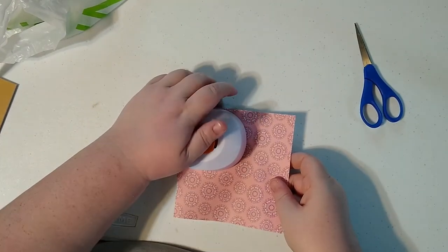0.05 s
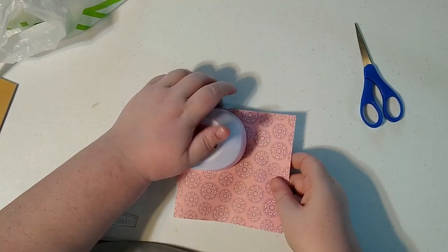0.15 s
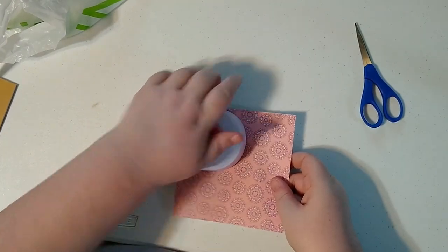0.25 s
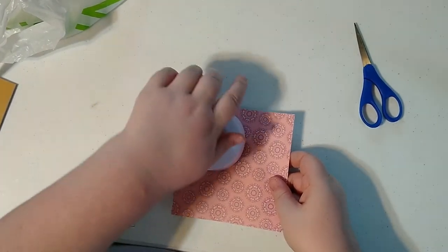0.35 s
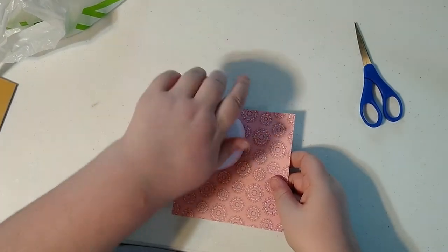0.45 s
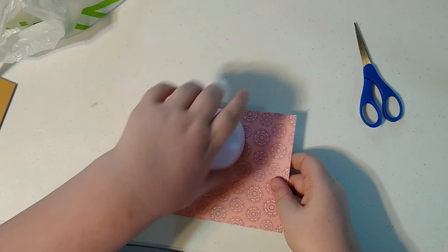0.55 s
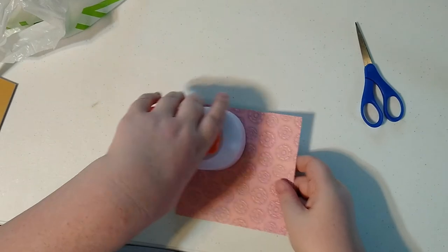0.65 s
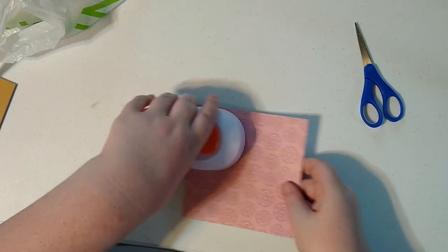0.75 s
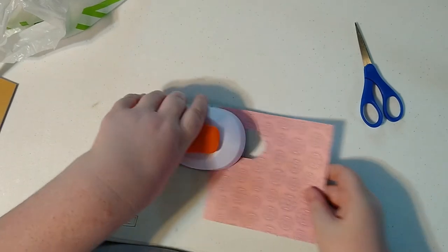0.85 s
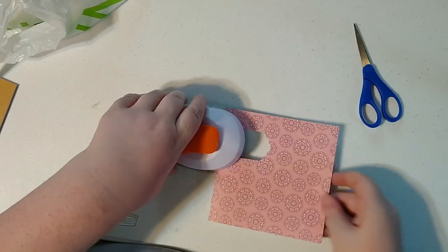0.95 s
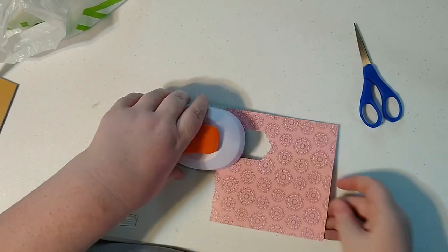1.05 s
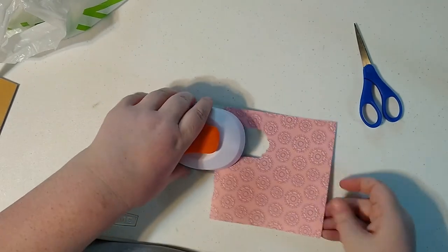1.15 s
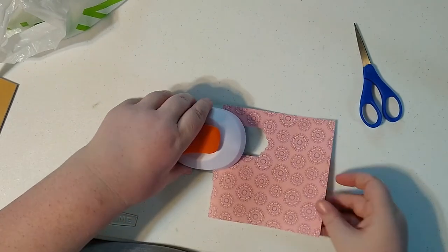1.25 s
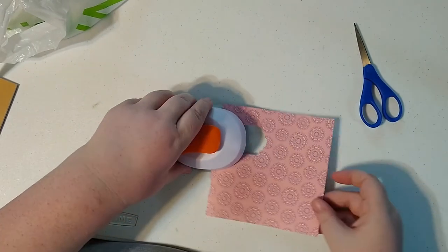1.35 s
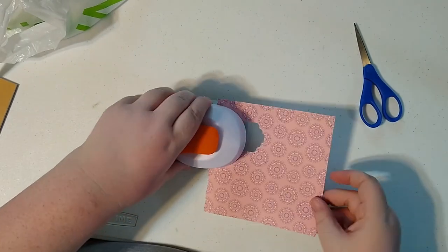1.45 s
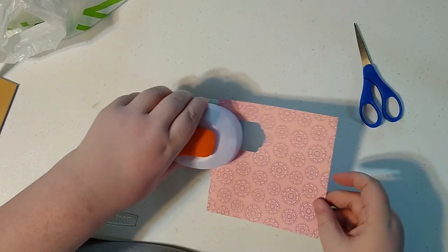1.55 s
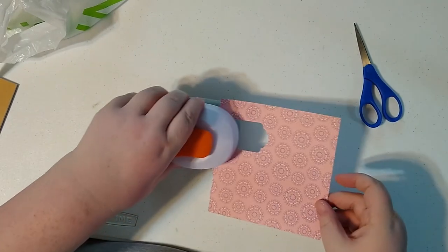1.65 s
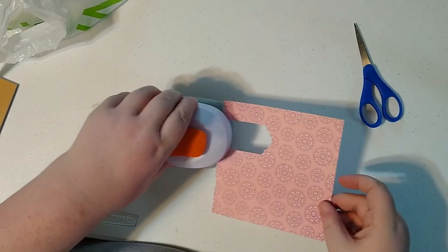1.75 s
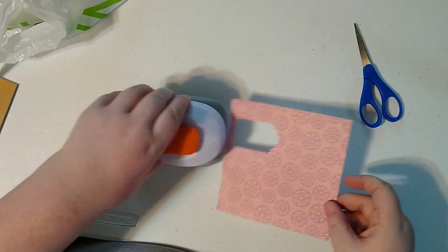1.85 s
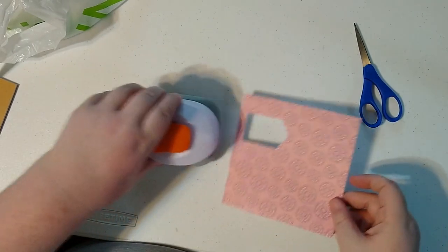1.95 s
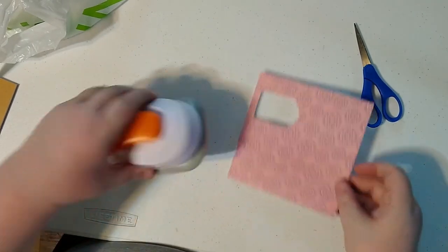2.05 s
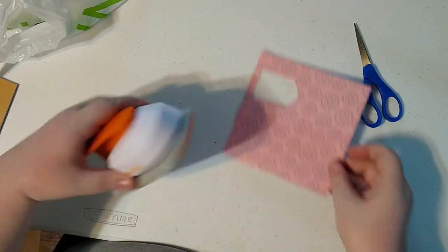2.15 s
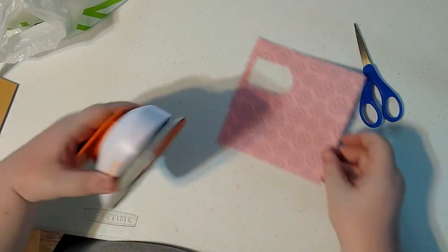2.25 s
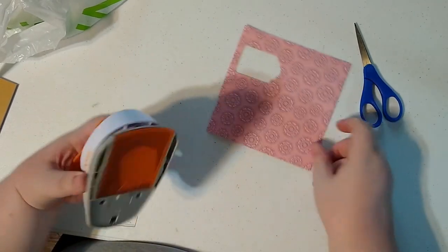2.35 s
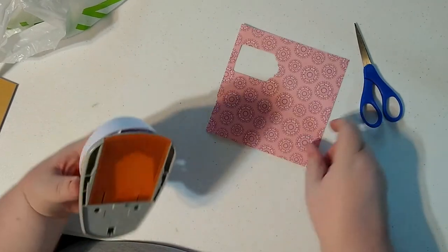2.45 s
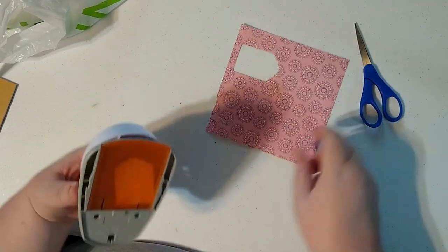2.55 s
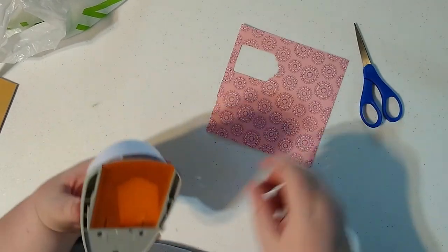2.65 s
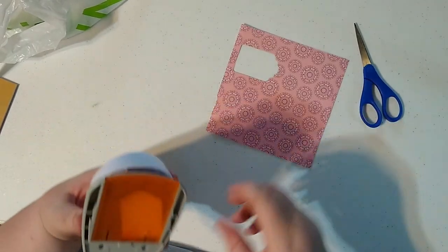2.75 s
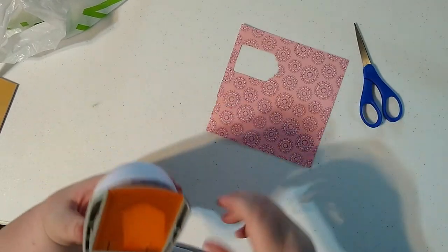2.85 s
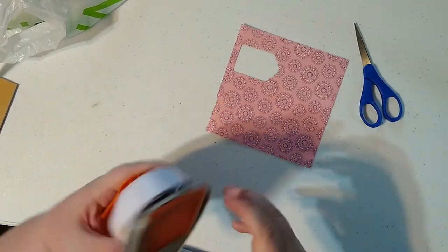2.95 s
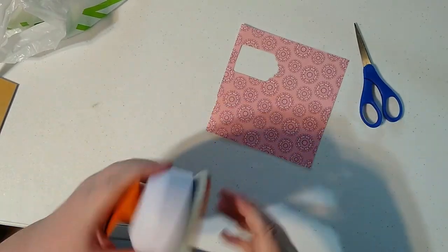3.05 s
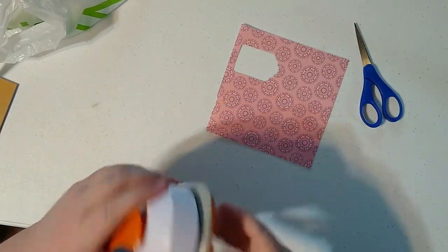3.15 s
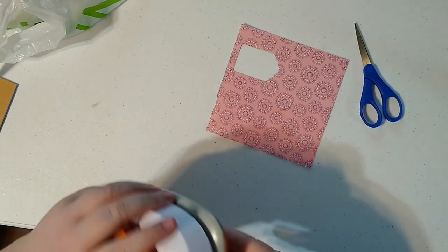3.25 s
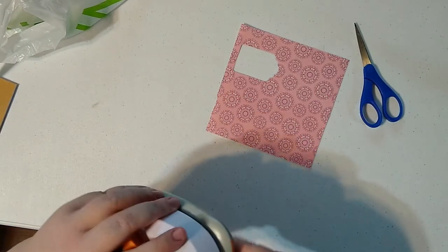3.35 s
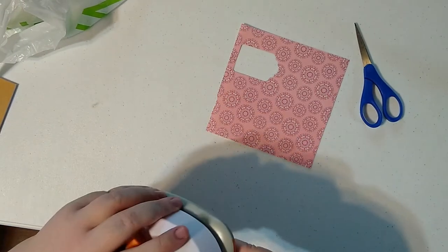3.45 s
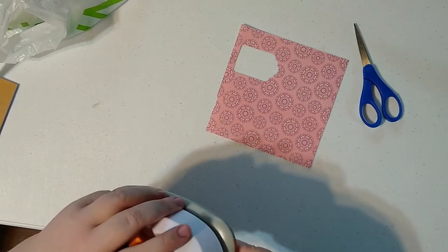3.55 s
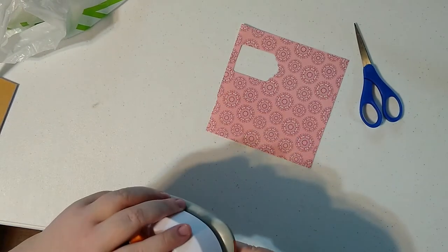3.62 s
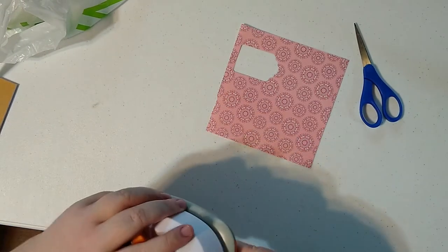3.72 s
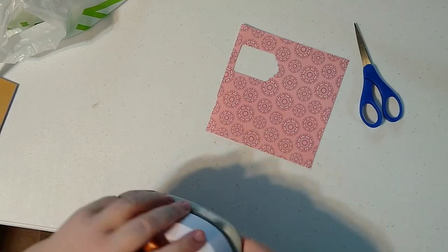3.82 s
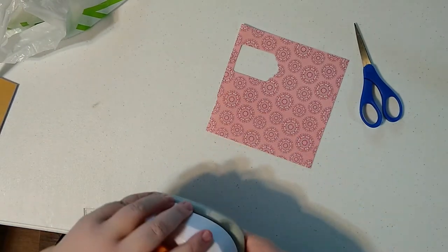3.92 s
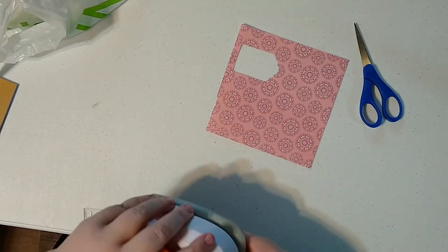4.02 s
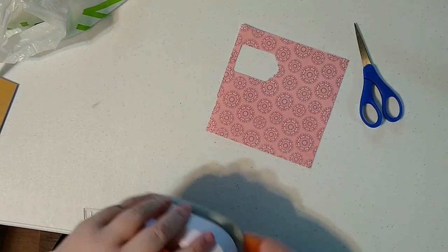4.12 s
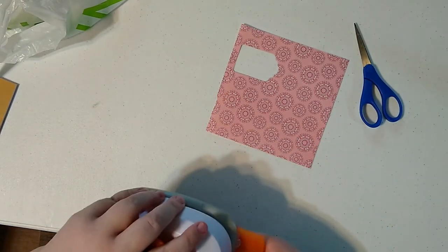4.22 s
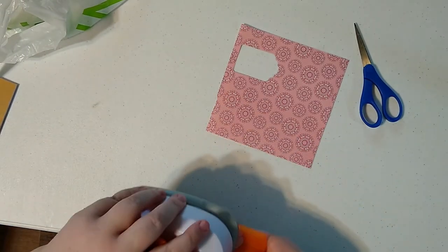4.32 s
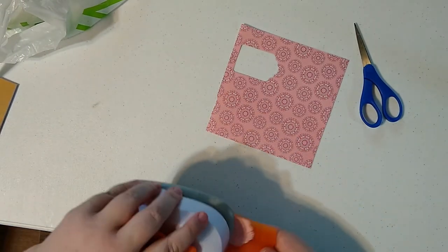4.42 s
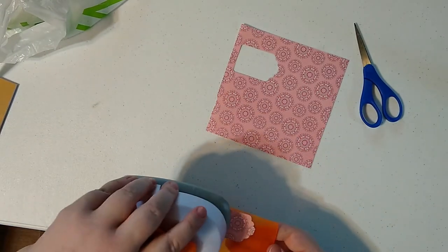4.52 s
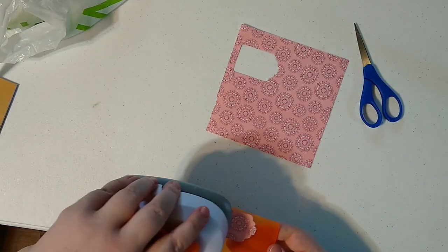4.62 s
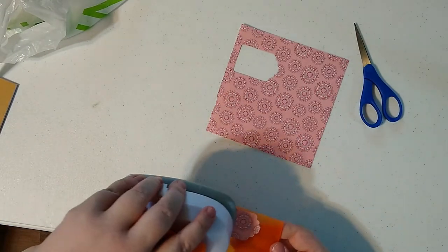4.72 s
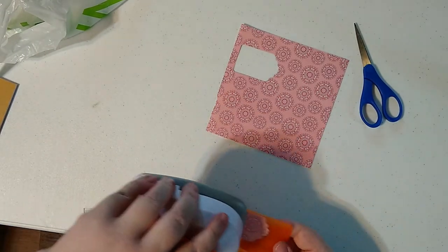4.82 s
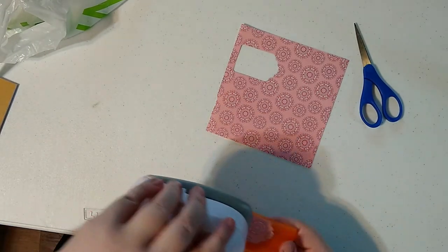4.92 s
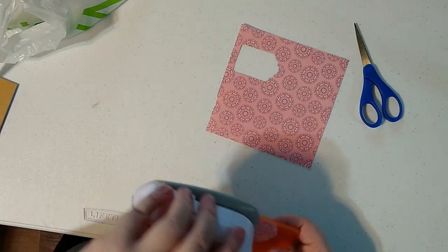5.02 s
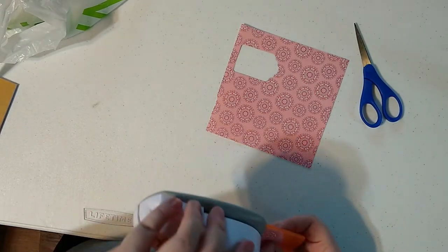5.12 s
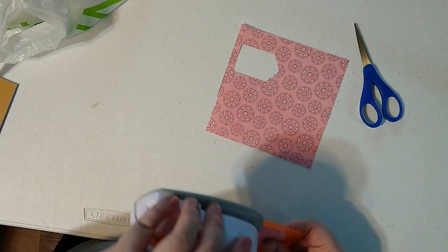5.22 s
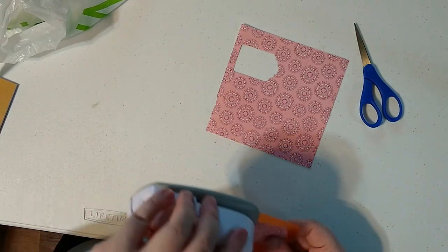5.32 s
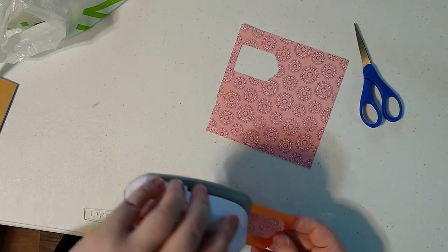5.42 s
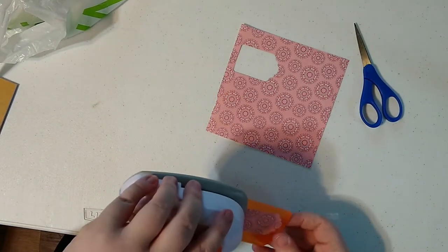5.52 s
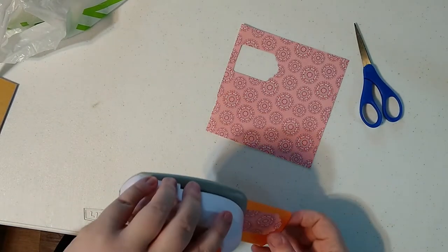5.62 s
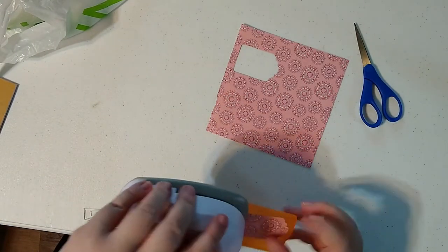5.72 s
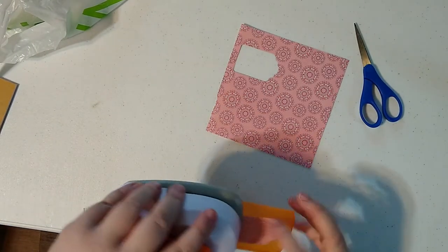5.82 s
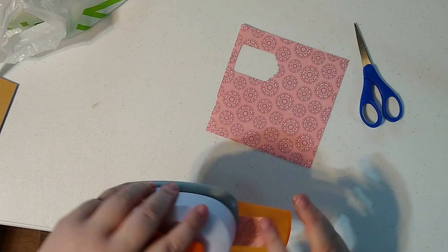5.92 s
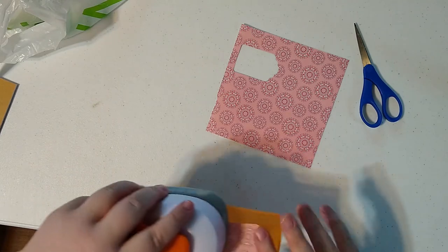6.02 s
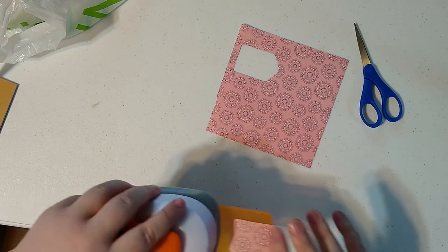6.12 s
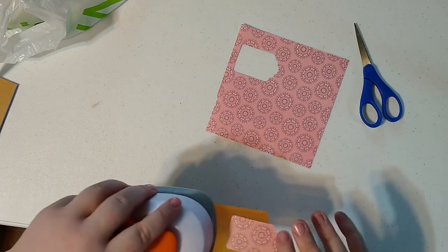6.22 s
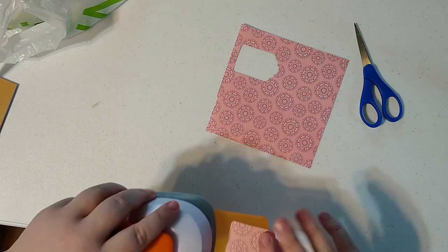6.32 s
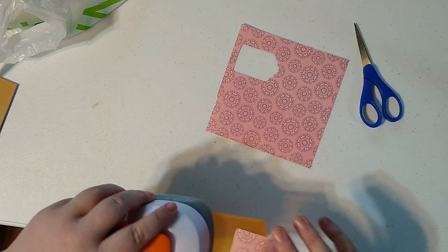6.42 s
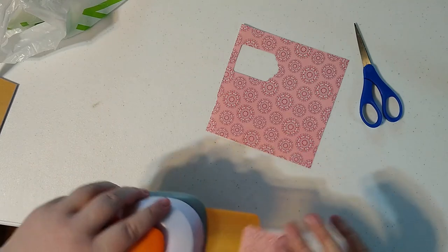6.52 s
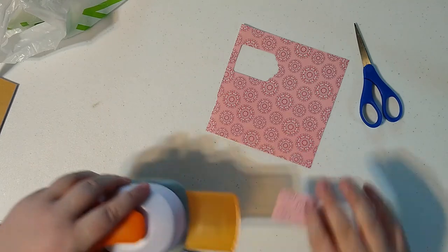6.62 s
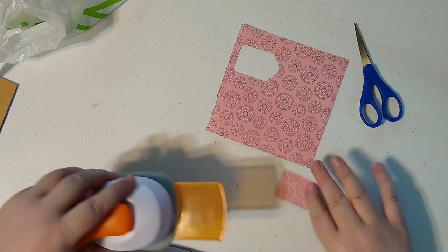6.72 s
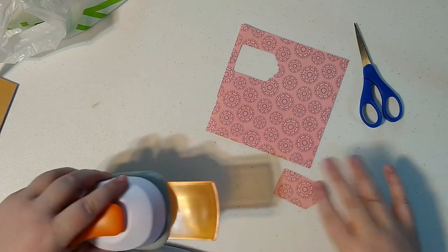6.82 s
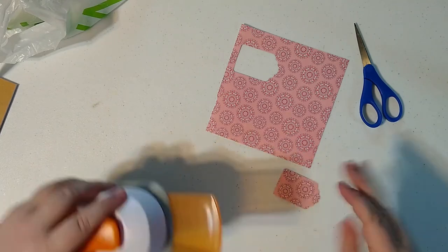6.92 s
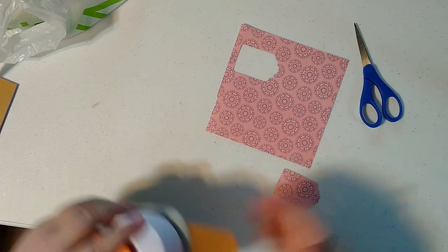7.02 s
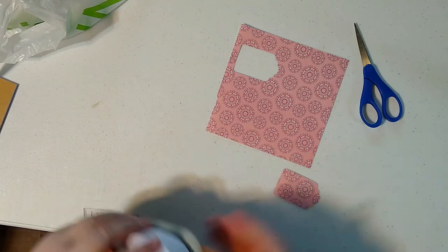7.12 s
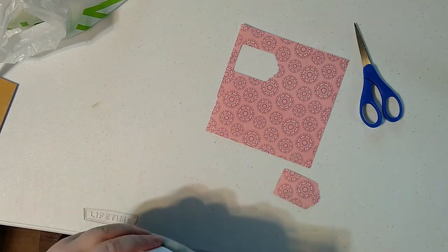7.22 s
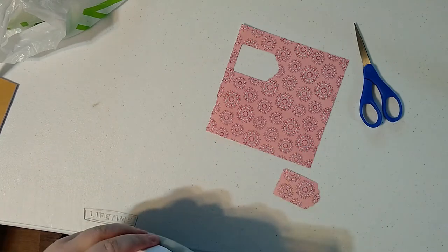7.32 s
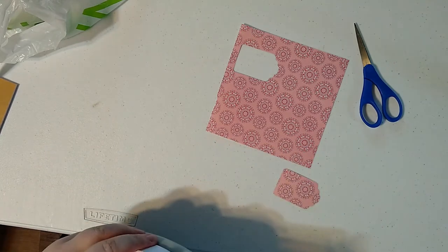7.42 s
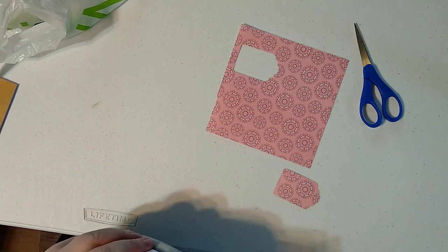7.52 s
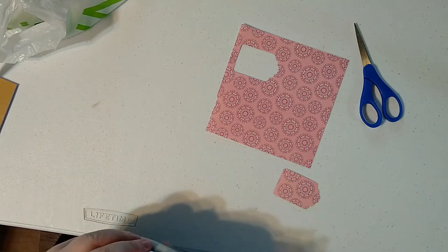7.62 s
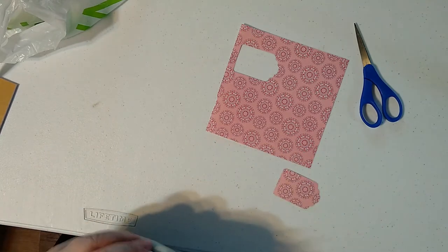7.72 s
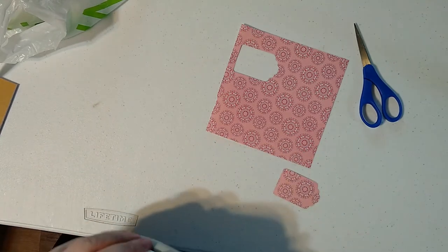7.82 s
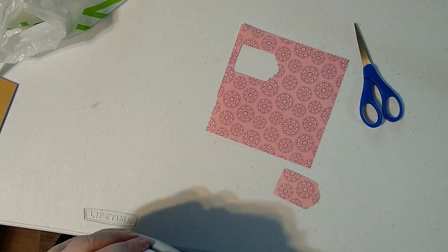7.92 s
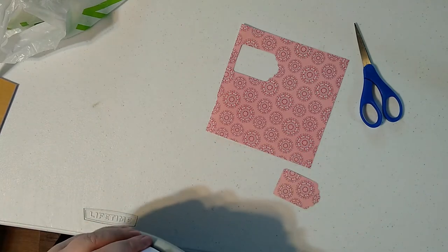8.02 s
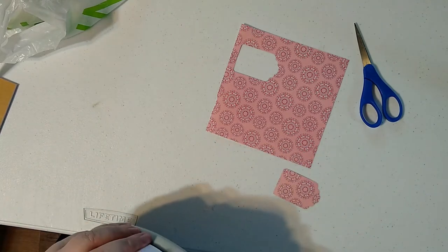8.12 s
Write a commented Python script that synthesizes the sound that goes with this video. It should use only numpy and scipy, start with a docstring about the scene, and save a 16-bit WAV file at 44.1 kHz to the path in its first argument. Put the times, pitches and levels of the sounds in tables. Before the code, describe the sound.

Card cracks under a craft punch with a ringing table thump, then faint plastic clicks and scrapes until its tray snaps shut.

```python
"""A table in a small quiet room, heard by two microphones above it.
A plastic craft punch crunches through card: the fibres crack, then the lever bottoms out with a thump
that makes the table ring. The card slides out with a soft hiss and the punch is picked up.
Its tray clicks open to free the cut-out, scrapes along its guides and snaps shut, ringing the plastic.
Fingertips brush the paper, a hand pats the table, and ventilation hums faintly."""
import sys
import numpy as np
from scipy import signal
from scipy.fft import rfft, irfft, next_fast_len
from scipy.io import wavfile
from scipy.ndimage import map_coordinates

SR = 44100
rng = np.random.default_rng(int(sys.argv[2]) if len(sys.argv) > 2 else 0)


def generate_wav(sig):
    """Save sig (samples, or channels by samples) to the path in sys.argv[1] as 16-bit PCM at SR."""
    pcm = np.round(np.clip(np.atleast_2d(sig).T, -1, 1) * 32767).astype(np.int16)
    wavfile.write(sys.argv[1], SR, pcm)


N = 359856


def card_cutting():
    """The palm presses and the housing creaks; card fibres shear ever harder, then crack apart."""
    # Pushes of the palm. Each row: peak time in seconds, level in dB, rise and fall in seconds.
    presses = [(.256, -52.5, .006, .07), (.343, -34.5, .018, .06)]
    # The blade breaks through. Each row: start in seconds, relative level in dB.
    cracks = [(0.3514, -30), (0.381, -21.5), (0.389, -20), (0.392, -8), (0.3956, -10)]
    # The tone of tearing card. Each row: frequency in Hz, relative level in dB.
    card_colour = [(40, -39.5), (130, -6.5), (520, -5.5), (1050, -3), (1290, -9.5), (1560, -4),
                   (1900, -6.5), (2300, -12), (3500, -14), (6000, -23.5), (8500, -35.5), (15000, -33)]
    creak_colour = [(40, -30.5), (120, -9), (330, 1), (620, -1.5), (1100, -15.5), (3000, -29.5),
                    (9000, -50.5)]
    palm = sum(stroke(*row) for row in presses)
    y = palm * friction(creak_colour, slips_per_s=900, spread_db=1, smooth_db=-7)
    y += blade_gain() * friction(card_colour, slips_per_s=1900, spread_db=2, smooth_db=-8.5)
    for s, db in cracks:
        add(y, s, amp(db + 13.5) * contact(card_colour, tilt_db=-3, rattle_db=5.5, rattle_s=.014))
    return in_room(y, wet_db=-5)


def blade_gain():
    """Shearing grows from the bite to the break, drops to a rub and fades once the blade bottoms out."""
    bite_s, break_s, bottom_s = .341, .392, .44
    shear_db, growth_db_per_s, rub_db = -41.5, 130, -42
    rise_s, fall_s = .02, .096
    t = np.arange(N) / SR
    level_db = np.where(t < break_s, shear_db + growth_db_per_s * np.maximum(t - bite_s, 0), rub_db)
    fade_db = 20 * (np.maximum(bite_s - t, 0) / rise_s + np.maximum(t - bottom_s, 0) / fall_s)
    return amp(level_db - fade_db)


def table_thumps():
    """The lever bottoms out, the punch judders and the table top rings. Later a hand pats it."""
    # The punch strikes the table. Each row: start in seconds, relative level in dB.
    thumps = [(0.326, -39.5), (.398, -16.5), (0.441, -3)]
    # A hand lands softly. Each row: start in seconds, relative level in dB.
    pats = [(6.875, -49), (6.892, -56), (6.915, -63.5)]
    # The table top's notes. Each row: frequency in Hz, relative level in dB, ring time in seconds.
    table_modes = [(135, -12, 0.41), (226.6, -8, 0.25), (280, -15.5, 0.19), (336.3, 1, 0.17),
                   (397, -1.5, 0.13), (449, -16, 0.33), (535, -16.5, 0.23), (603, -18.5, 0.22),
                   (807, -7, 0.12), (910, -16, 0.14)]
    # The tone of a thud. Each row: frequency in Hz, relative level in dB.
    thud = [(20, -60), (45, -22), (75, -20), (125, -1.5), (180, -3), (350, -1.5), (510, 3), (780, -6),
            (1220, -18), (1580, -14.5), (2200, -31.5), (3600, -24), (5000, -36.5), (8000, -57),
            (15000, -62)]
    y, side = np.zeros(N), np.zeros(N)
    for s, db in thumps:
        push = contact(thud, tilt_db=1, rattle_db=-15, rattle_s=.034)
        judder, sway = [contact(thud, tilt_db=-.5, rattle_db=19, rattle_s=.17) for _ in range(2)]
        add(y, s, amp(db + 13) * judder - amp(db + 17) * push)
        add(y, s, amp(db + 11) * ring(table_modes, size=16384))
        wall_echo = contact(thud, tilt_db=-6.5, rattle_db=-4, rattle_s=.022)
        add(y, s + .022, amp(db + 4) * wall_echo)
        add(side, s, amp(db + 7) * sway)  # the wide top reaches each microphone differently
    for s, db in pats:
        add(y, s, amp(db + 21.5) * contact(thud, tilt_db=-22, rattle_db=7, rattle_s=.15))
    return in_room(y, wet_db=-14, delay_s=.006) + np.array([side, -side])


def tray_snap():
    """The tray snaps past its catch and slaps home; its thin walls ring."""
    # Hits on catch and seat. Each row: start in seconds, relative level in dB, treble boost in dB.
    snaps = [(7.8551, -11, 0.5), (7.8576, -8, 2.5), (7.8637, -16, -2), (7.8823, -10, 4.5),
             (7.888, -6.5, -4)]
    # The tone of the catch. Each row: frequency in Hz, relative level in dB.
    catch_colour = [(60, -36), (150, -31), (300, -27), (510, -26.5), (640, -2.5), (850, -4), (1150, 0),
                    (1400, -7), (1720, -2), (2200, -6), (3100, -5), (4600, -12.5), (6000, -25),
                    (8500, -27.5), (15000, -30)]
    # The closed tray's notes. Each row: frequency in Hz, relative level in dB, ring time in seconds.
    tray_modes = [(642, 6.5, 0.046), (1095, 1, 0.07), (1248, -9, 0.079), (1385.6, -8.5, 0.033),
                  (1732, -4, 0.11), (2360, -7.5, 0.07), (2817, -3, 0.054), (3450, -6.5, 0.081),
                  (4100, -11.5, 0.0584)]
    y = np.zeros(N)
    for s, db, bright_db in snaps:
        crack = contact(catch_colour, tilt_db=bright_db, rattle_db=15, rattle_s=.014)
        walls = ring(tray_modes, stretch=np.exp(rng.normal(0, .0049)))
        add(y, s, amp(db + 14.5) * (crack + amp(-11) * walls))
    return in_room(y, wet_db=-5.5)


def shell_clicks():
    """Small knocks ring the plastic shell, the dull ones most; its pitch shifts with the grip."""
    # Lever and tray clicks. Each row: start in seconds, relative level in dB, treble boost in dB.
    clicks = [(1.0439, -25, 3), (1.0474, -24, -3.5), (1.049, -34, -3.5), (2.228, -48, -7.5),
              (2.438, -48, -3), (3.081, -45, -8.5), (3.125, -48.5, -3), (3.204, -42, -8.5),
              (3.521, -46.5, -1), (3.774, -27, -1), (3.7761, -33.5, -1.5), (3.855, -45, 0), (3.876, -48, 0),
              (3.942, -38, 0), (4.031, -42.5, -6), (4.213, -33, -7.5), (4.536, -45, 5),
              (4.589, -38.5, -8.5), (4.887, -54.5, 10), (5.422, -48, -6.5), (5.949, -54.5, 4),
              (6.705, -49, 3), (7.3115, -33, 5), (7.435, -47, -2), (7.568, -46, 3), (7.633, -48, -4),
              (7.665, -43.5, -6)]
    # The tone of a tick. Each row: frequency in Hz, relative level in dB.
    tick_colour = [(60, -32.5), (200, -23), (550, -15.5), (920, 0.5), (1300, -6), (1650, -5), (2200, -7),
                   (3000, -11), (3700, -3.5), (4600, -12), (5800, -19), (8000, -33.5), (15000, -36)]
    # The shell's notes. Each row: frequency in Hz, relative level in dB, ring time in seconds.
    shell_modes = [(879, -2.5, 0.055), (1027, 1, 0.051), (1105, -3, 0.056), (1366, -8, 0.04),
                   (1539, -5.5, 0.046), (1727, -0.5, 0.041), (2740, -13, 0.013), (3900, -17, 0.02)]
    # Fingers shifting on the punch add faint ticks at random moments.
    faint_ticks = [(rng.uniform(1.8, 6.2), rng.uniform(-59.5, -56.5), 0) for _ in range(5)]
    y = np.zeros(N)
    for s, db, bright_db in clicks + faint_ticks:
        tick = contact(tick_colour, tilt_db=bright_db, rattle_db=14, rattle_s=.018)
        shell = ring(shell_modes, stretch=np.exp(rng.normal(0, .045)))
        ring_db = -4.5 - .98 * bright_db
        add(y, s, amp(db + 14) * norm(tick + amp(ring_db) * shell))
    return in_room(y, wet_db=-12)


def handling():
    """Card slides smoothly; plastic scrapes and fingertips brush the paper under an unsteady hand."""
    # The card is pulled. Each row: peak time in seconds, level in dB, rise in seconds.
    pulls = [(.75, -72, 0.13), (.92, -65.5, 0.34), (1.03, -62, .4), (1.36, -69, 0.18), (1.485, -68, .25),
             (1.715, -65.5, .12), (2.455, -70.5, 0.34)]
    # Plastic scrapes. Each row: peak time in seconds, level in dB, rise and fall in seconds.
    scrapes = [(1.73, -67, .3, 0.26), (1.885, -64.5, .15, 0.053), (4.224, -49.5, 0.0113, .1),
               (4.54, -57.5, .1, 0.11), (4.598, -51, .04, 0.015), (7.45, -67.5, .13, 0.18),
               (7.67, -59.5, .09, .055), (7.75, -61, .05, 0.06)]
    # Fingertips brush. Each row: peak time in seconds, level in dB, rise in seconds.
    brushes = [(.92, -71, .17), (1.09, -72.5, .3), (5.45, -71, 0.12), (6.295, -68.5, .16), (6.6, -73, .12),
               (6.71, -67.5, 0.042), (6.878, -63, 0.031)]
    # The tones of rubbed paper, plastic and skin. Each row: frequency in Hz, relative level in dB.
    paper_colour = [(200, -24), (800, -0.5), (1550, 0.5), (2200, -1), (3400, 2), (4600, -6.5), (5800, -5.5),
                    (7500, -32.5), (15000, -17.5)]
    plastic_colour = [(300, -18.5), (1000, 0), (1600, 2), (2200, -7.5), (3400, -4), (4600, -9), (5800, -16),
                      (8000, -29.5), (15000, -29)]
    skin_colour = [(500, -59), (3000, 9.5), (7500, -3), (10000, -2.5), (14500, -2.5)]
    pull_gain = np.max([stroke(*row, fall_s=.17) for row in pulls], axis=0)
    scrape_gain = np.max([stroke(*row) for row in scrapes], axis=0)
    brush_gain = np.max([stroke(*row, fall_s=.051) for row in brushes], axis=0)
    card = pull_gain * friction(paper_colour, slips_per_s=700, spread_db=4, smooth_db=-3)
    plastic = scrape_gain * friction(plastic_colour, slips_per_s=1500, spread_db=6, smooth_db=-1)
    fingers = brush_gain * friction(skin_colour, slips_per_s=2000, spread_db=2.5, smooth_db=-2)
    pressure = amp(1.5 * wobble(points_per_s=30))
    return in_room(card + pressure * (plastic + fingers), wet_db=-4.5)


def ventilation():
    """Moving air makes a steady rush, with faint mains and fan tones."""
    # The mains and fan tones. Each row: frequency in Hz, level in dB.
    tones = [(120, -77), (311, -75.5)]
    # The tone of the air. Each row: frequency in Hz, relative level in dB.
    air_colour = [(25, -31), (55, -27), (90, -18), (103, -13.5), (118, -3.5), (170, -4), (210, -7),
                  (330, -6), (560, -14), (1550, -21.5), (2350, -28.5), (3200, -26.5), (5000, -34),
                  (15500, -39.5)]
    t = np.arange(N) / SR
    hum = sum(amp(db) * np.sin(2 * np.pi * (hz * t + rng.random())) for hz, db in tones)
    return amp(-65) * coloured(diffuse(N), air_colour) + hum


def in_room(x, wet_db, delay_s=.005):
    """The direct sound plus the walls' short echo, each frequency dying at its own speed."""
    # The room's echo. Each row: frequency in Hz, seconds to fade by 60 dB.
    echo_times = [(100, .3), (260, .22), (700, .18), (1800, .19), (5000, .16), (14000, .18)]
    hz, t, spectra = signal.stft(diffuse(SR // 3), SR, nperseg=256)
    fade = amp(-60 * t / along(echo_times, hz)[:, None])
    tail = signal.istft(spectra * fade, SR, nperseg=256)[1]
    tail = np.pad(norm(tail), ((0, 0), (round(delay_s * SR), 0)))
    return x + amp(wet_db) * signal.fftconvolve(x[None], tail, axes=1)[:, :N]


def diffuse(n):
    """Stereo noise from all directions, most alike on both sides in the middle pitches."""
    # How well left and right agree. Each row: frequency in Hz, likeness (1 same, -1 opposite).
    likeness = [(50, 0.29), (130, 0.24), (300, 0.26), (640, 0.68), (1400, 0.83), (2500, 0.13),
                (6000, -0.44), (12000, 0)]
    angle = lambda hz: np.arccos(along(likeness, hz)) / 2
    shares = lambda hz: np.array([np.cos(angle(hz)), np.sin(angle(hz))])
    mid, side = filtered(rng.standard_normal((2, n)), shares)
    return np.array([mid + side, mid - side])


def contact(colour, tilt_db, rattle_db, rattle_s, size=8192):
    """One blow: a sharp push and a dense, dying rattle. A higher tilt_db makes it brighter."""
    t, hz = np.arange(size) / SR, np.fft.rfftfreq(size, 1 / SR)
    envelope = amp(-60 * t / rattle_s) * (1 - np.exp(-t / .001))
    force = amp(rattle_db) * norm(rng.standard_normal(size) * envelope)
    force[0] += 1  # the push
    colour_db = along(colour, hz) + tilt_db * np.log2(1 + np.minimum(hz, 5000) / 1000)
    # Build the filter so that nothing sounds before the blow (minimum phase).
    cepstrum = irfft(np.log(amp(colour_db)))
    cepstrum[1:size // 2] *= 2
    cepstrum[size // 2 + 1:] = 0
    response = irfft(np.exp(rfft(cepstrum)))
    return norm(signal.fftconvolve(force, response)[:size])


def ring(modes, stretch=1, size=8192):
    """A struck object's notes, each fading 60 dB in its ring time; stretch scales their pitch."""
    t = np.arange(size) / SR
    tones = np.zeros(size)
    for hz, db, ring_s in modes:
        fade = amp(db + rng.normal(0, 1.5) - 60 * t / ring_s)
        tones += fade * np.sin(2 * np.pi * (stretch * hz * t + rng.random()))
    return norm(tones * (1 - np.exp(-t / .0015)))


def friction(colour, slips_per_s, spread_db, smooth_db):
    """Surfaces catch and let go: tiny slips of uneven size over a smooth hiss."""
    slips = (rng.random(N) < slips_per_s / SR) * rng.standard_normal(N)
    slips *= amp(spread_db * np.clip(rng.standard_normal(N), -2, 2))
    hiss = amp(smooth_db) * rng.standard_normal(N)
    return coloured(unit(slips) + hiss, colour)


def stroke(peak_s, db, rise_s, fall_s):
    """The gain of one movement: it grows tenfold every rise_s, then shrinks tenfold every fall_s."""
    t = np.arange(N) / SR - peak_s
    return amp(db - 20 * np.maximum(-t / rise_s, t / fall_s))


def wobble(points_per_s):
    """A smooth curve through random points."""
    points = rng.standard_normal(int(N * points_per_s / SR) + 4)
    return map_coordinates(points, [np.arange(N) * points_per_s / SR])


def amp(db):
    """Turn decibels into a gain."""
    return 10 ** (np.asarray(db) / 20)


def unit(x):
    """Scale to an average power of 1."""
    return x / np.sqrt(np.mean(x ** 2) + 1e-20)


def norm(x):
    """Scale to a total energy of 1."""
    return x / np.sqrt(np.sum(x ** 2) + 1e-20)


def along(points, hz):
    """Read between (Hz, value) points on a pitch scale."""
    freqs, values = np.transpose(points)
    return np.interp(np.log(hz + 1), np.log(freqs + 1), values)


def filtered(x, response):
    """Multiply each frequency in x by response(hz)."""
    n = x.shape[-1]
    size = next_fast_len(n + SR // 4)
    return irfft(rfft(x, size) * response(np.fft.rfftfreq(size, 1 / SR)), size)[..., :n]


def coloured(x, colour):
    """Shape the tone of x with (Hz, dB) points, at an average power of 1."""
    return unit(filtered(x, lambda hz: amp(along(colour, hz))))


def add(track, s, x):
    """Mix x into the track at s seconds."""
    part = track[round(s * SR):][:len(x)]
    part += x[:len(part)]


def scene():
    """Everything on the table, in the room."""
    return card_cutting() + table_thumps() + tray_snap() + shell_clicks() + handling() + ventilation()


def record(dry):
    """Two microphones: the left lags in the treble, a few bands dip, deep bass and the top are cut."""
    # Bands where the microphones partly cancel. Each row: centre in Hz, width in Hz, depth from 0 to 1.
    hollows = [(2180, 260, 0.2), (4350, 220, .4), (6666, 290, 0.5)]
    # The microphones' balance. Each row: frequency in Hz, left minus right in dB.
    balance = [(80, 6), (160, 3.5), (400, 1.5), (700, 1), (1700, -0.5), (5000, 1), (8000, 2.5), (13000, 2)]
    lag_s, bass_hz, top_hz = 15 / SR, 48, 15750
    treble = lambda hz: np.clip((hz - 1400) / 1200, 0, 1)
    left = filtered(dry[0], lambda hz: np.exp(-2j * np.pi * hz * lag_s * treble(hz)))
    right = dry[1]
    dips = lambda hz: sum(depth * np.exp(-((hz - at) / width) ** 2) for at, width, depth in hollows)
    mid = filtered((left + right) / 2, lambda hz: 1 - dips(hz))
    side = (left - right) / 2
    lean = lambda hz: amp(along(balance, hz) * np.array([[.5], [-.5]]))
    pair = filtered(np.array([mid + side, mid - side]), lean)
    pair = signal.sosfilt(signal.butter(2, bass_hz, "highpass", fs=SR, output="sos"), pair)
    return filtered(pair, lambda hz: hz < top_hz)


dry = scene()
out = record(dry)
generate_wav(out)
```